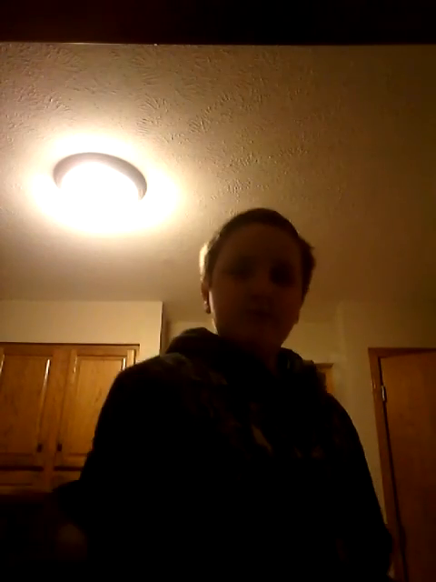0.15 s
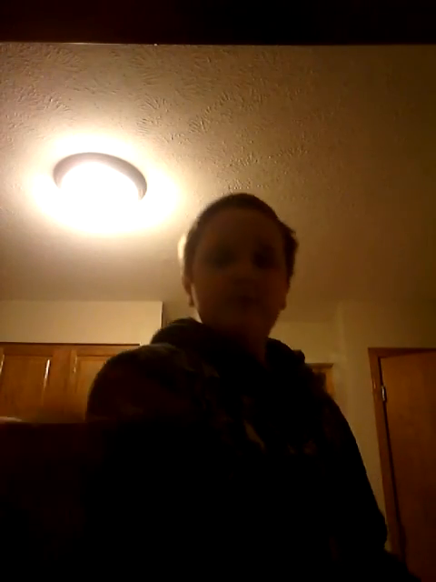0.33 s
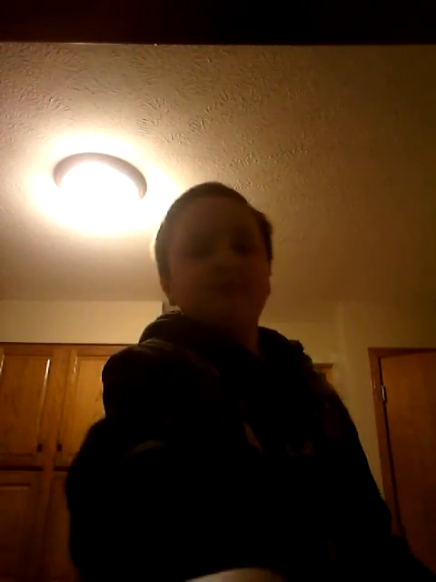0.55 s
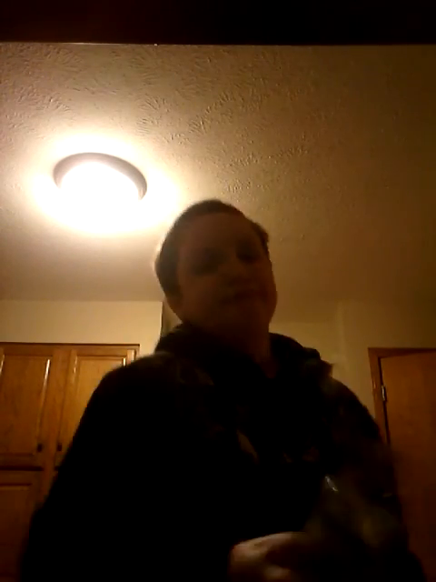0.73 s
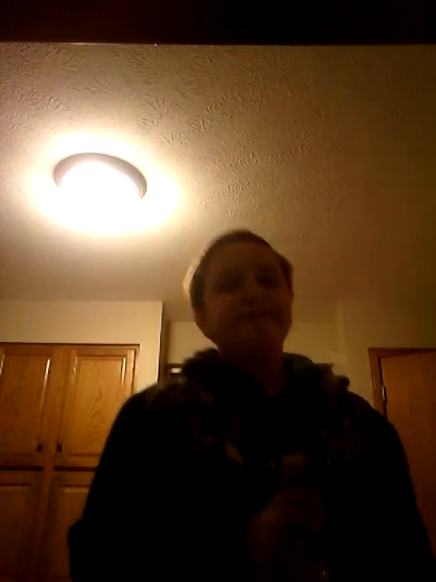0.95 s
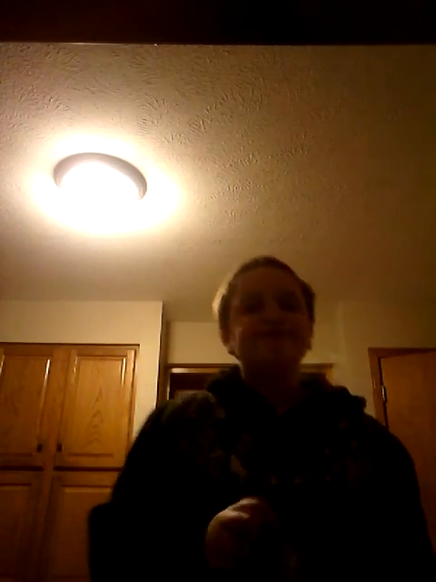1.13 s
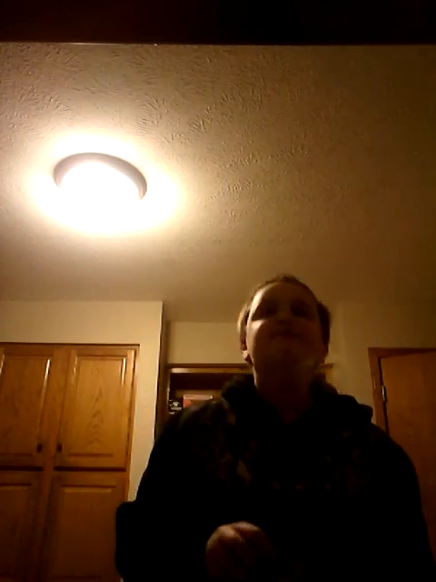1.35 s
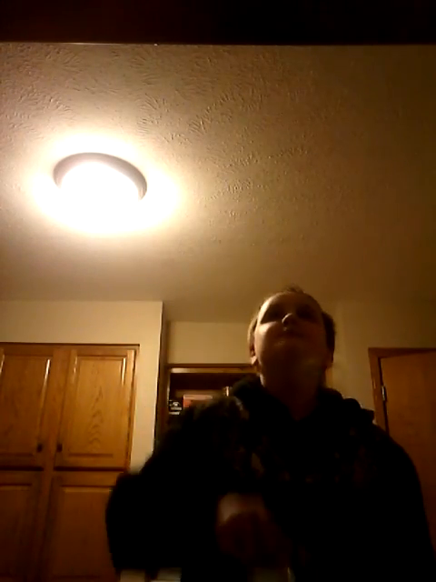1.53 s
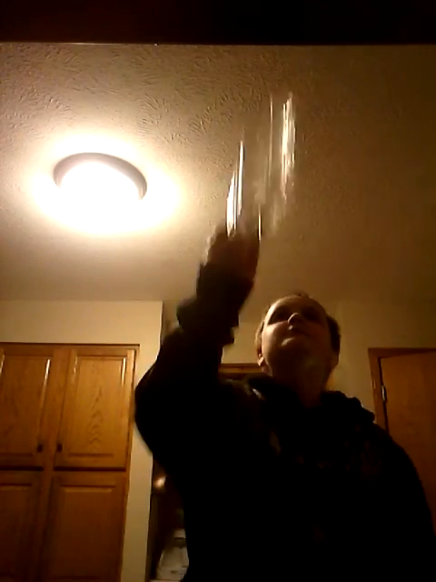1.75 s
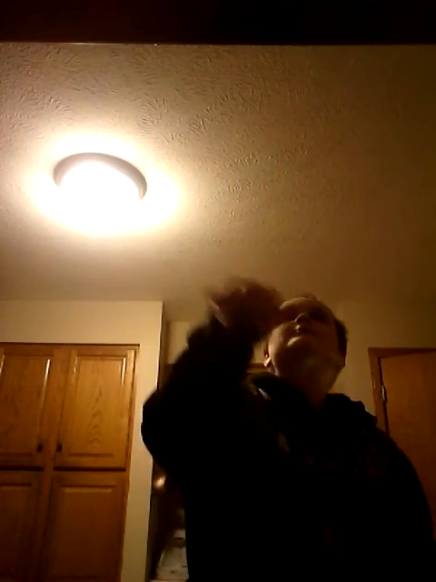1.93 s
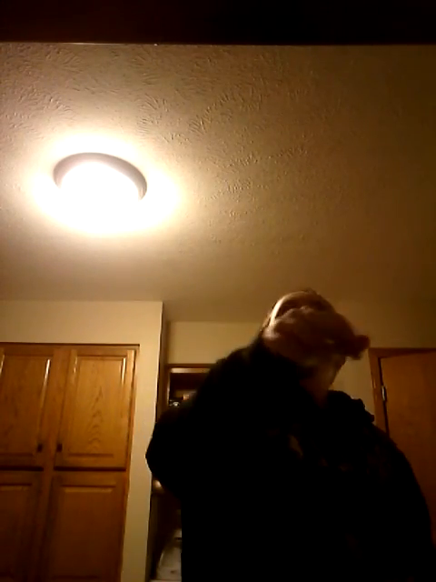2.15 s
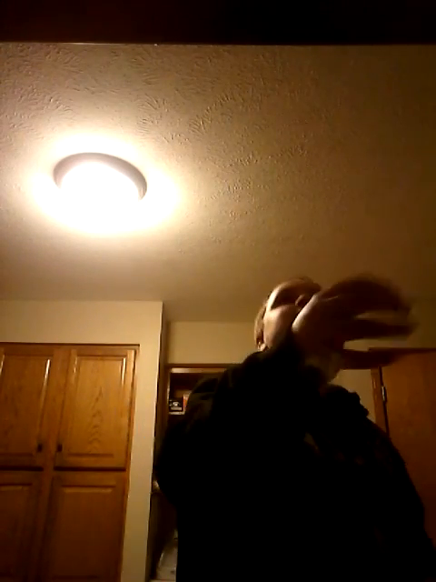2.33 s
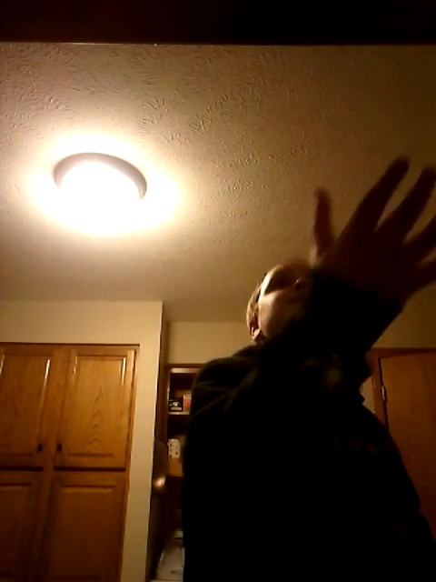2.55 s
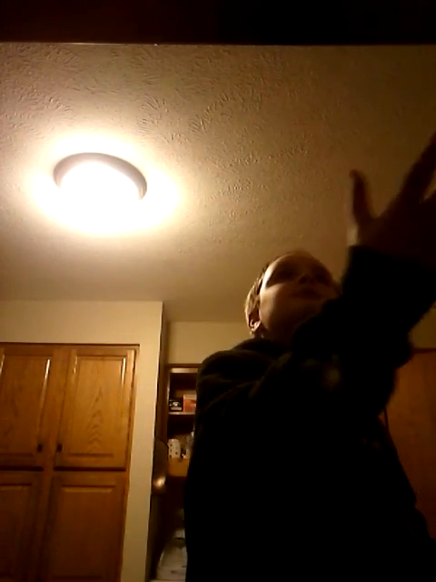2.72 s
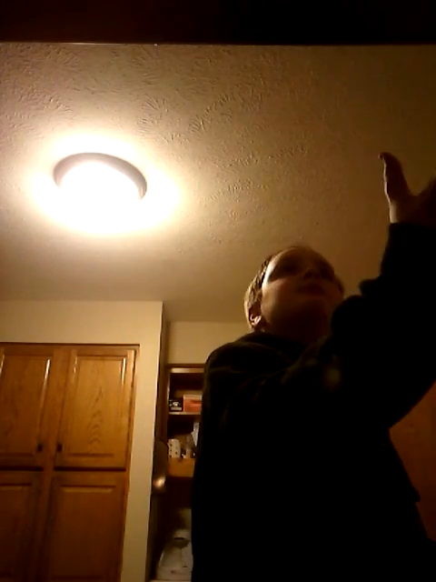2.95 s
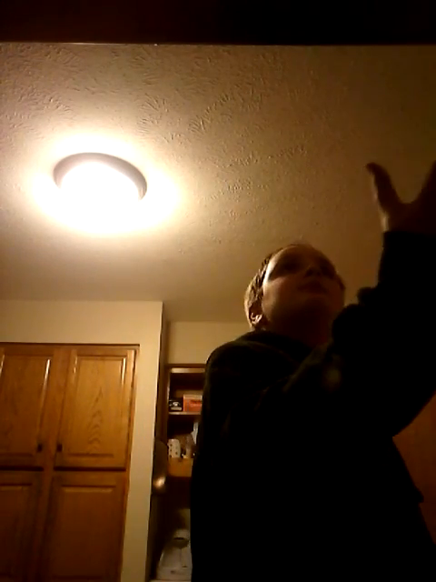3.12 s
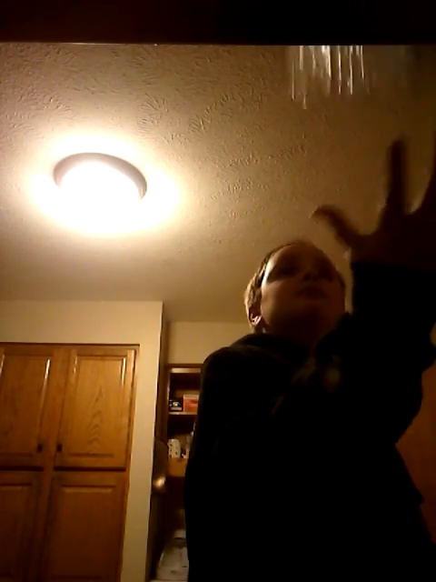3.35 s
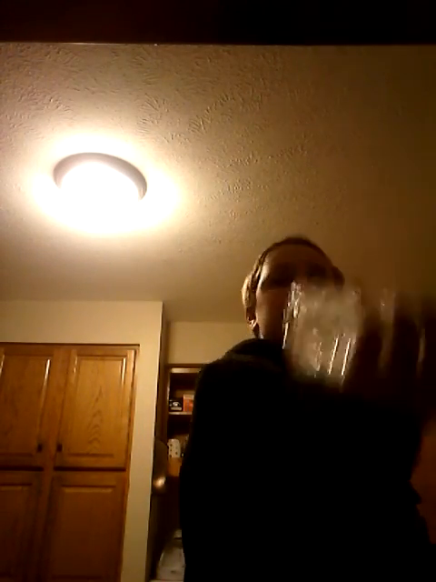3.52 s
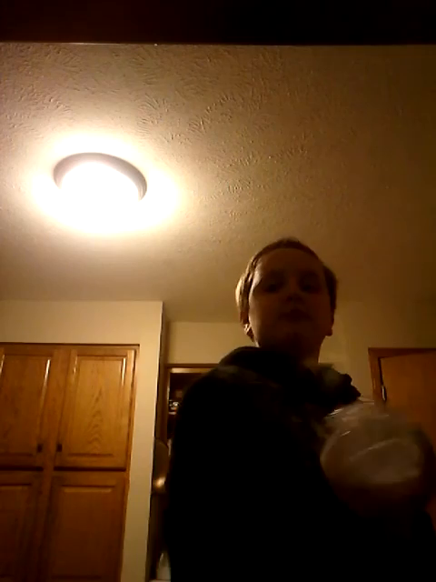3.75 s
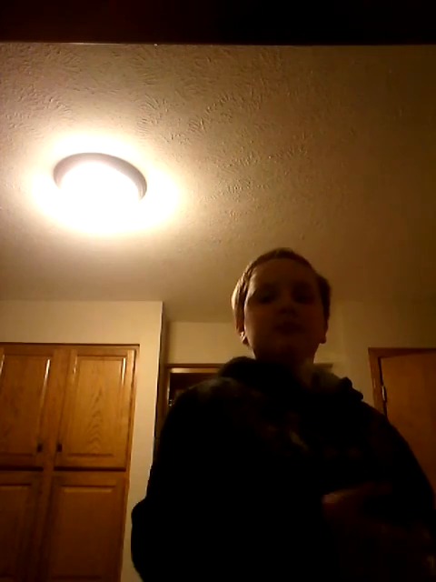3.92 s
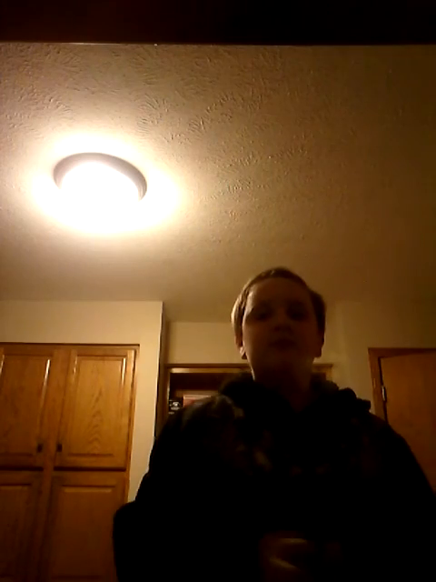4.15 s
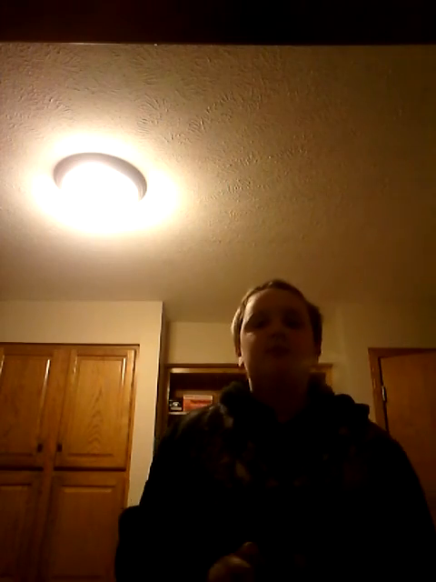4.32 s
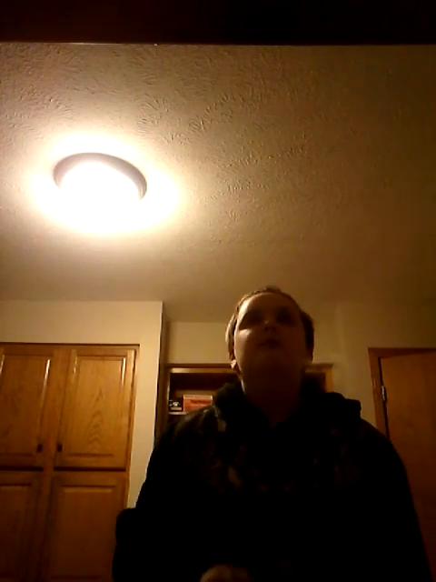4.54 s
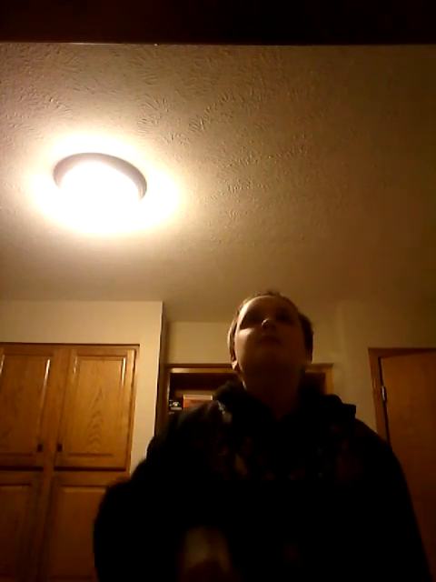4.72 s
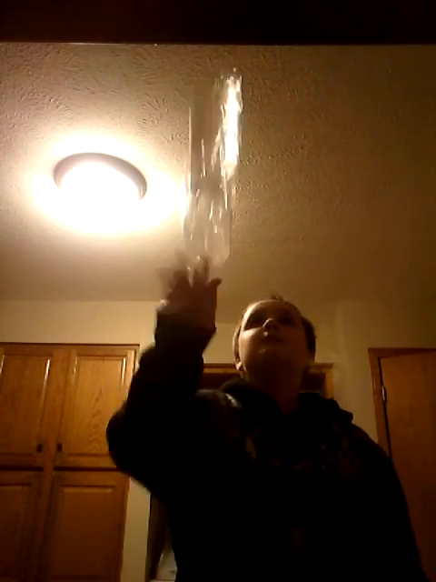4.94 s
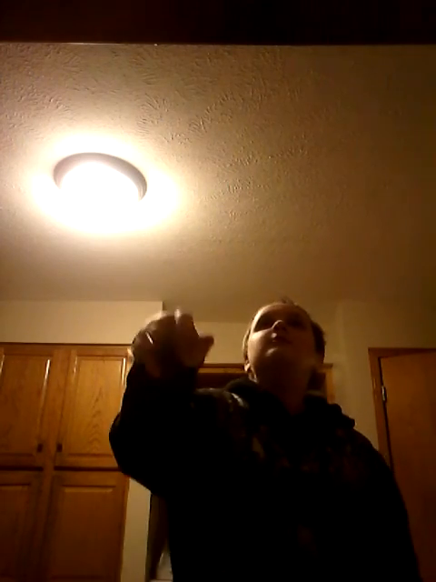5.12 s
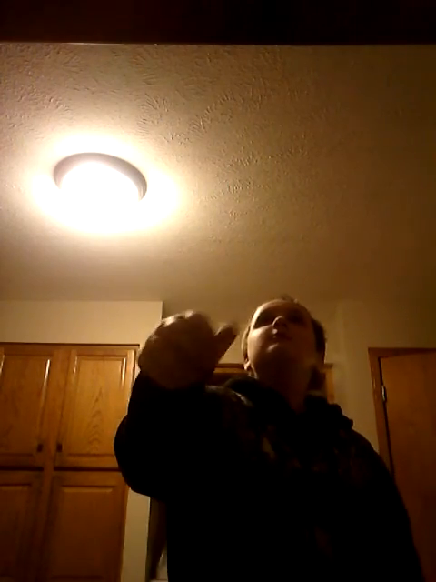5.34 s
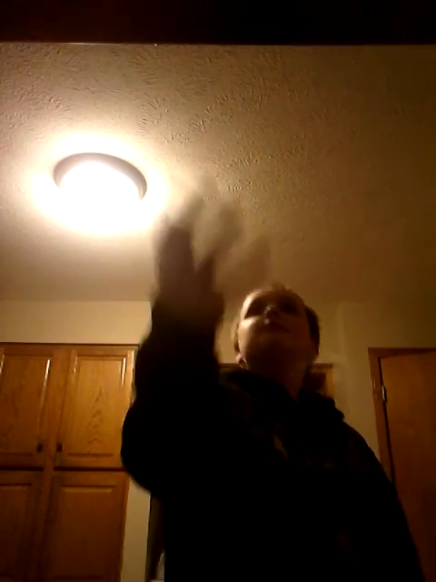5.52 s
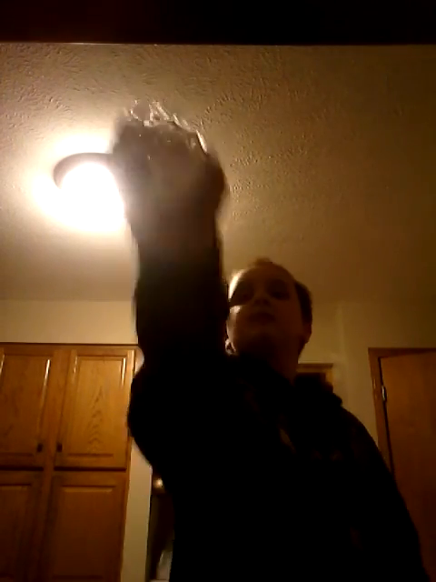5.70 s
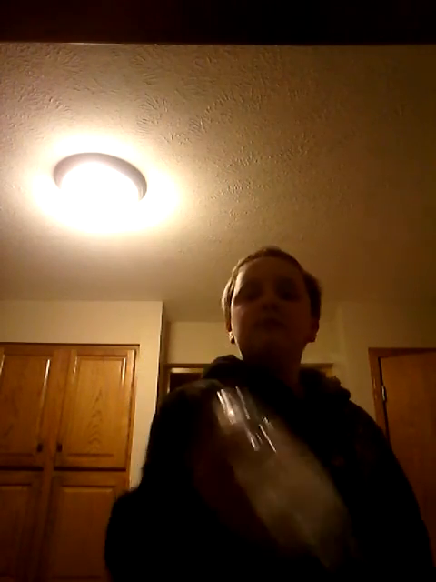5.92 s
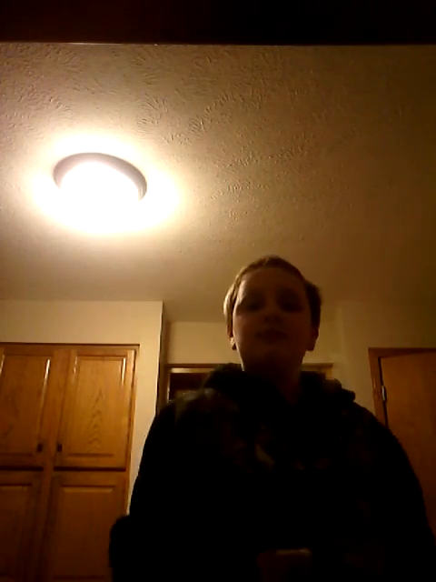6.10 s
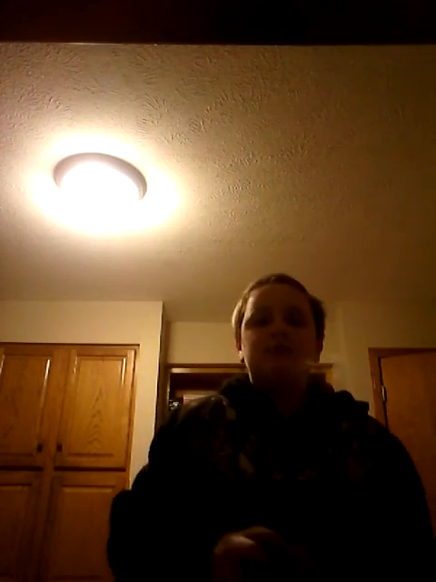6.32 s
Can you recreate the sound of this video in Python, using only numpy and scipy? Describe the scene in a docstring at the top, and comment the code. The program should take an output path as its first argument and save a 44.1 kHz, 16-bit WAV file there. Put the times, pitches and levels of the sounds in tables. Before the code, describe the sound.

A part-filled plastic bottle crackles in the hands, knocks and rolls on a wooden cabinet, then slaps back into the palm, in a small kitchen.

```python
"""Flipping a part-filled bottle

A plastic bottle is flipped in a kitchen. It knocks and rolls on a wooden cabinet and slaps into the hand:
each blow is a burst of shell noise, a slosh, and a set of fading sine waves for the heavy body.
Shaped noise bursts make the wall's pops, the squeaks and the rasp of ribs under the fingers; longer noise
strokes make skids, swashing water and rubbing hands. A small hard room answers the blows, pops, squeaks
and rasp, over a low rumble, a faint hiss and an appliance hum."""
import sys
import numpy as np
from scipy import signal
from scipy.fft import rfft, irfft, next_fast_len
from scipy.io import wavfile
from scipy.ndimage import map_coordinates

SR = 44100
rng = np.random.default_rng(int(sys.argv[2]) if len(sys.argv) > 2 else 0)


def int16_out(signal):
    """Quantize to a 16-bit WAV file."""
    q = np.round(np.clip(np.atleast_2d(signal).T, -1, 1) * 32767)
    wavfile.write(sys.argv[1], SR, q.astype(np.int16))


N = 280780
T = np.arange(N) / SR  # time in the scene, s
AGE = T[:24000]  # time since the start of one short sound, s
TOP_HZ = 16300  # the treble ends here

# The bottle hits the cabinet, before the stage offsets:
# t/s, shell level/dB, thud level/dB, knock level/dB, lag of the water/s, shell tilt/(dB per octave)
LANDINGS = [(2.150, -21.5, -26.5, -26, .03, 2), (2.354, -12, -16.5, -17, .022, 0),
            (2.403, -25, -24.5, -26.5, .012, -2), (2.708, -19.5, -14, -26, .028, 0.5)]
# The bottle meets the hand: same columns as the landings
CATCHES = [(.526, -43, -32.5, -45.5, 0.021, -5.5), (1.456, -32.5, -66, -43.5, .011, -5.5),
           (3.511, -10, -18.5, -25.5, .011, -0.5), (3.775, -59, -45, -42, 0.0057, -10),
           (4.046, -31, -31.5, -34.5, 0.012, -1), (5.702, -16, -17, -24.5, .014, -7),
           (5.732, -15, -26, -30.5, .012, -0.5), (6.177, -28, -32, -30.5, 0.013, -1.5)]
# Stages of a landing (edge, side, water), added to each hit:
# share of the lag, shell level/dB, body level/dB, rise/s, shell t60/s, tilt/(dB per octave)
LANDING_STAGES = [(0, -2, -16, .005, 0.089, 0), (.45, -1, -6, 0.0034, 0.17, -2.5),
                  (1, -12, -0.5, .004, .19, -4)]
# Stages of a catch (fingertips, palm, water): same columns
CATCH_STAGES = [(-.4, -10.5, -17.5, 0.0011, 0.08, -2.5), (0, -3, -11, 0.00073, .08, -1.5),
                (1, -10, 0.5, 0.0018, 0.3, -1)]
# Ringing modes of the wooden cabinet: f/Hz, relative level/dB, t60/s
CABINET_MODES = [(61, -27, 0.34), (94.4, -0.5, 0.082), (124.8, -1, 0.066), (165, -11, 0.11),
                 (180, -14.5, 0.33), (217.5, 4.5, 0.11), (286.5, -2.5, 0.22), (314.5, -12, 0.44),
                 (342.4, -2, 0.1), (391, -4, 0.2), (430, -6, 0.23), (496.4, 3.5, 0.12), (574.4, -6, 0.25),
                 (694, -11.5, 0.33), (808, -13, 0.16), (876, -30.5, 0.17), (1037, -2, 0.14),
                 (1190, -7.5, 0.092), (1364, -16.5, 0.13)]
# Ringing modes of the held bottle and its water: f/Hz, relative level/dB, t60/s
WATER_MODES = [(57.1, -17.5, 0.16), (74.6, -27.5, 0.18), (99, -19, 0.21), (121, -3, 0.18),
               (180.2, -1.5, 0.1), (228.4, -11.5, .08), (301, -7, 0.11), (365.4, -3, 0.11),
               (405.3, 3.5, 0.064), (491, 1, 0.11), (588.6, -8, 0.19), (764, -7.5, 0.1)]
# Colour of the shell's crackle: f/Hz, relative level/(dB per Hz)
SHELL_COLOUR = [(350, -41), (600, -4), (698, -12.5), (748, -17.5), (931, -5.5), (1140, -1), (1700, -5),
                (2210, -2.5), (3120, -5), (4580, 1), (5630, -11), (8270, -23.5), (14500, -36),
                (16000, -51.5)]
# Colour of water thrown against the wall: f/Hz, relative level/(dB per Hz)
SLOSH_COLOUR = [(30, -35), (70, -8.5), (150, -1), (500, 0), (750, -8), (1100, -2.5), (1600, -5.5),
                (3000, -27), (8000, -54)]
# Resonances of the plastic wall: f/Hz, half-width/Hz, lift/dB
WALL_RESONANCES = [(1195, 36, 1.5), (1420, 85, 2.5), (1910, 31, 5.5), (2350, 67, 3), (2880, 57, 5.5),
                   (3650, 33, -1.5), (4460, 100, 2)]

# The wall buckles, sharply or with a dull pop: t/s, level/dB, centre f/Hz, t60/s
SNAPS = [(.217, -46.5, 1610, .029), (.322, -59.5, 7000, .011), (.5125, -42, 2090, 0.07),
         (.541, -26, 766, 0.016), (.552, -18.5, 374, 0.012), (.5803, -14, 2260, .028),
         (.5814, -3.5, 3940, 0.0026), (0.608, -43, 10000, .008), (.618, -19.5, 2160, 0.033),
         (.669, -35.5, 4100, .06), (.679, -30, 304, 0.011), (.779, -45, 2100, 0.042),
         (.84, -47.5, 4630, 0.025), (1.2793, -16.5, 2380, .034), (1.459, -29.5, 1580, 0.035),
         (1.58, -46, 2830, 0.062), (1.712, -45, 2100, 0.029), (1.798, -34, 1450, 0.056),
         (1.857, -43.5, 1690, 0.043), (2.457, -20, 1460, 0.059), (3.512, -12, 1390, 0.047),
         (3.635, -24, 2790, 0.0393), (3.707, -34.5, 2760, 0.027), (3.772, -28.5, 1340, 0.021),
         (3.783, -39, 520, 0.022), (3.823, -42, 2660, 0.037), (4.023, -41, 1520, .08),
         (4.05, -38, 570, .041), (4.066, -32, 3900, 0.22), (4.299, -42, 3050, 0.163),
         (4.829, -48.5, 4180, 0.019), (4.939, -44, 1210, 0.013), (5.012, -35, 1990, 0.022),
         (5.088, -42, 5530, 0.049), (5.117, -41.5, 4800, 0.084), (5.704, -20.5, 7000, 0.036),
         (5.829, -29.5, 4420, 0.039), (5.861, -22, 1410, 0.024), (6.049, -35.5, 2000, 0.025),
         (6.186, -22, 414, 0.014), (6.193, -31.5, 5500, 0.04), (6.241, -38, 275, 0.019)]
# Colour shared by the pops and squeaks: f/Hz, relative level/(dB per Hz)
SNAP_COLOUR = [(50, -8.5), (200, 5), (1500, 2), (3000, -3), (4800, 2.5), (6500, -10.5), (10000, -14.5),
               (16000, -15.5)]
# Where the pops are heard, from right and dry to nearer the middle: t/s, left-right level/dB, room level/dB
PLACE = [(.54, -11, -13.5), (.6, -6, -20.5), (.68, -3, -5.5), (1.25, -0.5, -6.5), (3.7, -1.5, -8.5),
         (5.1, 0, -4), (6.1, -1, -8)]
# Width of a pop at 1 kHz; higher pops are broader by this power of their centre
SNAP_SPREAD_OCTAVES, SPREAD_GROWS = 0.82, 0.15
# Skin slips on the plastic with a short squeak: t/s, level/dB, f/Hz, t60/s
SQUEAKS = [(1.8, -39, 4700, 0.081), (3.598, -11.5, 4580, 0.027), (4.984, -45.5, 2750, .11),
           (5.014, -24, 3340, 0.023), (5.215, -44.5, 4570, 0.1)]
SQUEAK_SPREAD_OCTAVES, SQUEAK_PAN_DB = 0.18, 2.5  # positive pan is louder on the left
# Colour of one rib's tick: f/Hz, relative level/(dB per Hz)
RIB_COLOUR = [(150, -50), (480, -2), (900, -10), (1700, 6.5), (3200, -4), (5000, 1.5), (6500, -5.5),
              (10000, -14), (16000, -23.5)]
# Fingers rasp across the ribs
RASP_START_S, RIBS_PER_S, RIB_T60_S = 1.1248, 115, .008
RIB_DB, RIB_PAN_DB, RIB_ROOM_DB = -27, -2, -2.5

# The bottle rolls on the cabinet: start t/s, stop t/s, rumble level/dB, scrape level/dB
ROLLS = [(2.256, 2.321, -35, -52.5), (2.405, 2.691, -23, -34.5), (2.734, 3.082, -32.5, -77)]
ROLL_ATTACK_S, ROLL_FALLS_DB_PER_S, ROLL_STOP_T60_S = 0.025, 54.5, .12
# The rolling bottle skids: peak t/s, level/dB, half-length/s
SLIDES = [(2.615, -36.5, 0.044)]
# Colour of the push that drums the wood: f/Hz, relative level/dB
DRUMMING_COLOUR = [(60, -14.5), (120, 6.0), (220, -11.0), (360, 7.5), (520, -8.0), (800, -4.5), (1400, -21.0)]
# Colour of plastic scraping on wood: f/Hz, relative level/(dB per Hz)
SCRAPE_COLOUR = [(200, -14.5), (800, 10.5), (1600, 4.5), (3000, 0.5), (4800, -1.5), (6500, -19.5), (16000, -36)]
# The water swings on after a catch: peak t/s, level/dB, half-length/s
SWASHES = [(.63, -50.5, 0.031), (3.70, -46, 0.048), (5.83, -39.5, 0.082), (6.23, -37, 0.014)]
# Colour of the swinging water: f/Hz, relative level/(dB per Hz)
SWASH_COLOUR = [(30, -37), (70, -8.5), (140, -4), (250, -13), (500, -18), (1000, -46), (3000, -80.5)]
# Strokes of hands and sleeves on the bottle: peak t/s, level/dB, half-length/s
RUBS = [(0, -61.5, 0.15), (.69, -48, 0.034), (.98, -46, 0.042), (1.42, -48.5, 0.062), (1.97, -52, 0.075),
        (3.48, -60, .015), (3.95, -55.5, 0.092), (4.17, -53, 0.123), (4.55, -53, 0.16), (5.2, -54.5, 0.096),
        (6.3, -58.5, 0.26)]
# Colour of the rubbing: f/Hz, relative level/(dB per Hz)
RUBBING_COLOUR = [(200, -19), (600, -2.5), (1500, 9), (3300, 5), (4800, 9.5), (6000, -6.5), (9000, -15),
                  (16000, -18.5)]
# A stroke dies a little slower than it swells; shape 1 is pointed, 2 is round
RELEASE_OVER_ATTACK, STROKE_SHAPE = 1.2, 1.2

# Colour of the room's air: f/Hz, relative level/(dB per Hz)
AIR_COLOUR = [(15, -30.5), (25, -14.5), (48, -7.5), (127, -4.5), (190, -3.5), (263, -21), (394, -13.5),
              (659, -22), (1190, -20), (3080, -26.5), (4140, -25.5), (6560, -33), (14800, -36.5),
              (16000, -48.5)]
# Tones of the appliance: f/Hz, level/dB
HUM = [(118.4, -64), (177.6, -69.5), (301.5, -82), (414.5, -77.5), (500.6, -80)]
# The hiss comes up once and stays
HISS_EARLY_DB, HISS_LATE_DB, HISS_RISE_AT_S, HISS_RISE_S = -73, -64.5, 1.6, 0.42
# Likeness of left and right: f/Hz, correlation (1 is the same)
ALIKE = [(130, 1), (290, 0.99), (640, 0.63), (1400, -0.31), (3000, -0.035), (15000, 0.048)]
# Difference in colour between the channels: f/Hz, left-right level/dB
LEAN = [(120, -1), (200, 1), (380, -3.5), (700, 1), (1300, -2), (4400, 1), (8000, -1), (15000, -3.5)]
# How long the kitchen rings: f/Hz, t60/s
KITCHEN = [(80, 0.88), (250, 0.52), (700, 0.27), (2000, 0.41), (4500, 0.34), (8000, 0.29), (15000, 0.26)]


def amp(db):
    """Turn decibels into a gain."""
    return 10 ** (np.asarray(db) / 20)


def unit(x):
    """Scale to an rms of 1."""
    return x / np.sqrt(np.mean(x ** 2) + 1e-20)


def along(points, hz):
    """Read a value between (f/Hz, value) points, on a log frequency axis."""
    f, v = np.transpose(points)
    return np.interp(np.log(hz + 1), np.log(f + 1), v)


def curves(rows):
    """Give one value per sample for each column after the time."""
    s, *cols = np.transpose(rows)
    return [np.interp(T, s, c) for c in cols]


def fade(t, t60):
    """Die away exponentially, by 60 dB in the time t60."""
    return np.exp(-np.log(1000) * t / np.maximum(t60, 1e-3))


def add(track, s, sound):
    """Mix a sound into the track at time s."""
    part = track[:, round(s * SR):][:, :sound.shape[-1]]
    part += sound[..., :part.shape[1]]


def noise(colour_db, size, grain_db=0):
    """Make coloured stereo noise of rms 1 in millisecond grains; both channels share the bass."""
    hz = np.fft.rfftfreq(size, 1 / SR)
    knots = np.arange(size) / 40  # a new random grain level every 40 samples
    levels = rng.standard_normal(int(knots[-1]) + 2)
    grains = amp(grain_db * map_coordinates(levels, [knots], order=1))
    spectrum = rfft(rng.standard_normal((2, size)) * grains) * amp(colour_db(hz))
    # share the noise between middle and sides to get the wanted likeness
    turn = np.arccos(np.clip(along(ALIKE, hz), -1, 1)) / 2
    mid, side = irfft(spectrum * [np.cos(turn), np.sin(turn)], size)
    return unit(np.array([mid + side, mid - side]))


def in_room(x, room_db, build=0.0015):
    """Add the kitchen's answer: fresh noise each time, fading at its own rate in each band."""
    hz, t, bands = signal.stft(noise(np.zeros_like, len(AGE)), SR, nperseg=256)
    fading = bands * fade(t, along(KITCHEN, hz)[:, None])
    tail = signal.istft(fading, SR, nperseg=256)[1][:, :len(AGE)]
    tail = tail * (1 - np.exp(-AGE / build))
    answer = signal.fftconvolve(x, tail / np.linalg.norm(tail[0]), axes=1)[:, :x.shape[1]]
    return x + amp(room_db) * answer


def wall(f):
    """Give the lift in dB that the wall's resonances lend to pops and crackles."""
    return sum(db / (1 + ((f - hz) / width) ** 2) for hz, width, db in WALL_RESONANCES)


def strokes(rows):
    """Give the gain over time of strokes that swell and die away."""
    def reach(s, half):
        return np.maximum(s - T, (T - s) / RELEASE_OVER_ATTACK) / half
    return sum(amp(db) * np.exp(-reach(s, half) ** STROKE_SHAPE) for s, db, half in rows)


def contacts(hits, stages):
    """Unfold each hit in stages: the shell touches first and the water arrives a moment later."""
    return [(s + share * lag, shell_db + stage_db, thud_db + body_db, knock_db + body_db,
             rise, t60, tilt_db + stage_tilt_db)
            for s, shell_db, thud_db, knock_db, lag, tilt_db in hits
            for share, stage_db, body_db, rise, t60, stage_tilt_db in stages]


def blows(rows, modes, grain_db, shell_room_db, body_room_db, thud_hz, knock_hz,
          slosh_db, slosh_t60, bright_db):
    """Crackle the shell, throw the water and ring a heavy body; thud and knock levels weight its modes."""
    out = np.zeros((2, N))
    hz, mode_db, life = np.transpose(modes)
    for s, shell_db, thud_db, knock_db, rise, t60, tilt_db in rows:
        onset = 1 - np.exp(-AGE / max(rise, 1e-4))

        def shell_colour(f):
            bright = along([(5000, 0.0087), (14000, bright_db)], f)
            tilt = tilt_db * np.log2(np.maximum(f, 700))  # tilts only above 700 Hz
            return along(SHELL_COLOUR, f) + wall(f) + bright + tilt

        shell = amp(shell_db) * noise(shell_colour, len(AGE), grain_db) * fade(AGE, t60)
        splash = noise(lambda f: along(SLOSH_COLOUR, f), len(AGE), grain_db)
        slosh = amp(knock_db + slosh_db) * splash * fade(AGE, slosh_t60)

        # no two blows excite the modes quite alike
        push_db = along([(thud_hz, thud_db), (knock_hz, knock_db)], hz)
        size = amp(mode_db + push_db + rng.normal(0, 1, len(hz)))
        # higher modes reach the two channels out of step
        skew = np.arccos(np.clip(along(ALIKE, hz), -1, 1)) * rng.choice([-1, 1], len(hz)) / 2
        phase = rng.uniform(0, 2 * np.pi, len(hz)) + np.array([skew, -skew])
        swing = 2 * np.pi * hz[:, None] * AGE
        sway = size[:, None] * fade(AGE, life[:, None])
        body = np.cos(phase) @ (sway * np.sin(swing)) + np.sin(phase) @ (sway * np.cos(swing))
        add(out, s, in_room(onset * (shell + slosh), shell_room_db) + in_room(onset * body, body_room_db))
    return out


def landings():
    """Hit the cabinet: the wood's modes ring under the shell's crackle."""
    return blows(contacts(LANDINGS, LANDING_STAGES), CABINET_MODES, grain_db=-1.5,
                 shell_room_db=-6.0, body_room_db=-11.5, thud_hz=220, knock_hz=340,
                 slosh_db=-6.0, slosh_t60=0.38, bright_db=-0.5)


def catches():
    """Slap into the hand: the water's modes thud under a brighter crackle."""
    return blows(contacts(CATCHES, CATCH_STAGES), WATER_MODES, grain_db=1.5,
                 shell_room_db=-5.0, body_room_db=-14.0, thud_hz=181.0, knock_hz=422,
                 slosh_db=-2.5, slosh_t60=0.031, bright_db=10.0)


def click(colour_db, t60, pan_db, rise):
    """Buckle thin plastic once: a coloured noise burst that rises fast and dies away."""
    decay = fade(AGE, t60) * (1 - np.exp(-AGE / rise)) ** 2
    burst = noise(lambda f: colour_db(f) + wall(f), len(AGE), grain_db=-1.5) * decay
    # give both channels the same energy before panning
    even = burst * np.linalg.norm(decay) / np.linalg.norm(burst, axis=1, keepdims=True)
    return even * amp([[pan_db / 2], [-pan_db / 2]])


def pop(centre_hz, spread, t60, pan_db, room_db, rise_cycles=0.25):
    """Click around one frequency, with the room's answer; low pops start more softly."""
    def colour(f):
        octaves_off = np.log2((f + 1) / centre_hz)
        return along(SNAP_COLOUR, f) - 20 * np.log10(1 + (octaves_off / spread) ** 2)
    return in_room(click(colour, t60, pan_db, rise_cycles / centre_hz), room_db)


def snaps():
    """Pop the wall as the grip changes; the bottle's place sets the side and how dry each pop is."""
    out = np.zeros((2, N))
    pan_db, room_db = curves(PLACE)
    for s, db, centre_hz, t60 in SNAPS:
        spread = SNAP_SPREAD_OCTAVES * (centre_hz / 1000) ** SPREAD_GROWS
        now = round(s * SR)
        add(out, s, amp(db) * pop(centre_hz, spread, t60, pan_db[now], room_db[now]))
    return out


def squeaks(room_db=-10, rise_cycles=5):
    """Slip fingers on the wall, which rings up in one narrow band."""
    out = np.zeros((2, N))
    for s, db, hz, t60 in SQUEAKS:
        squeak = pop(hz, SQUEAK_SPREAD_OCTAVES, t60, SQUEAK_PAN_DB, room_db, rise_cycles)
        add(out, s, amp(db) * squeak)
    return out


def rasp(count=17, scatter_s=.0003):
    """Tick once for each rib under the fingers; the room smears the ticks into a rasp."""
    out = np.zeros((2, N))
    for s in RASP_START_S + np.arange(count) / RIBS_PER_S:
        tick = click(lambda f: along(RIB_COLOUR, f), t60=RIB_T60_S, pan_db=RIB_PAN_DB, rise=0.000065)
        level = amp(RIB_DB + rng.normal(0, 1))
        add(out, s + rng.normal(0, scatter_s), level * in_room(tick, RIB_ROOM_DB))
    return out


def rolling(start, stop):
    """Give the gain of one roll: it picks up, falls steadily and dies out after its stop."""
    age = np.maximum(T - start, 0)
    pick_up = 1 - np.exp(-age / ROLL_ATTACK_S)
    ending = fade(np.maximum(T - stop, 0), ROLL_STOP_T60_S)
    return pick_up * amp(-ROLL_FALLS_DB_PER_S * age) * ending


def roll(width_hz=22):
    """Roll on the cabinet: noise shaped by its modes drums, while plastic scrapes the wood."""
    drumming = sum(amp(db) * rolling(start, stop) for start, stop, db, _ in ROLLS)
    scraping = sum(amp(db) * rolling(start, stop) for start, stop, _, db in ROLLS) + strokes(SLIDES)

    def wood(f):
        power = sum(amp(db) ** 2 / (1 + ((f - hz) / width_hz) ** 2) ** 2 for hz, db, _ in CABINET_MODES)
        return along(DRUMMING_COLOUR, f) + 10 * np.log10(power)

    drums = drumming * noise(wood, N, grain_db=1.0)
    return drums + scraping * noise(lambda f: along(SCRAPE_COLOUR, f), N, grain_db=0.5)


def swash():
    """Surge water to and fro in the held bottle: a low, lumpy gurgle of noise."""
    return strokes(SWASHES) * noise(lambda f: along(SWASH_COLOUR, f), N, grain_db=5)


def rub():
    """Rub hands and sleeves on the bottle: fine, grainy friction noise."""
    return strokes(RUBS) * noise(lambda f: along(RUBBING_COLOUR, f), N, grain_db=2)


def background(rumble_db=-64, waver=0.97, split_hz=400):
    """Hum with tones of wandering phase, over the room's low rumble and faint hiss."""
    def drift():
        return map_coordinates(rng.standard_normal(64), [T * 8])  # 8 random points a second

    hum = sum(amp(db) * np.sqrt(2) * np.sin(2 * np.pi * hz * T + waver * drift()) for hz, db in HUM)
    # split the air's colour into a low and a high part
    rumble = noise(lambda f: along(AIR_COLOUR, f) - 10 * np.log10(1 + (f / split_hz) ** 4), N)
    hiss = noise(lambda f: along(AIR_COLOUR, f) - 10 * np.log10(1 + (split_hz / (f + 1)) ** 4), N)
    risen = (1 + np.tanh((T - HISS_RISE_AT_S) / HISS_RISE_S)) / 2
    hiss_db = HISS_EARLY_DB + (HISS_LATE_DB - HISS_EARLY_DB) * risen
    return hum + amp(rumble_db) * rumble + amp(hiss_db) * hiss


def scene():
    """Mix the bottle's sounds with the kitchen's background."""
    bottle = landings() + catches() + snaps() + squeaks() + rasp() + roll() + swash() + rub()
    return bottle + background()


def record(dry, low_hz=44):
    """Colour the channels slightly differently, round off loud peaks, cut deep bass and top treble."""
    size = next_fast_len(N + SR // 2)
    hz = np.fft.rfftfreq(size, 1 / SR)
    lean = along(LEAN, hz) / 2
    thin = signal.sosfilt(signal.butter(4, low_hz, "highpass", fs=SR, output="sos"), dry)
    heard = irfft(rfft(thin, size) * amp([lean, -lean]), size)
    rounded = heard / (1 + (heard / .9) ** 6) ** (1 / 6)  # peaks stay below 0.9
    return irfft(rfft(rounded) / (1 + (hz / TOP_HZ) ** 200), size)[:, :N]


dry = scene()
out = record(dry)
int16_out(out)
```